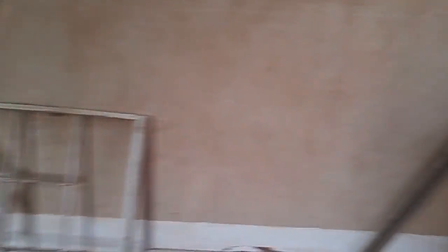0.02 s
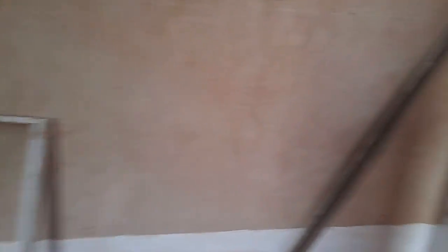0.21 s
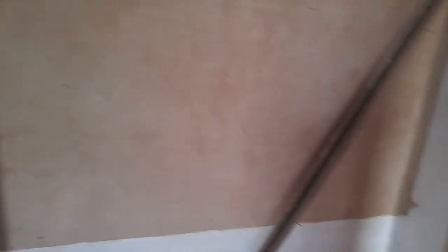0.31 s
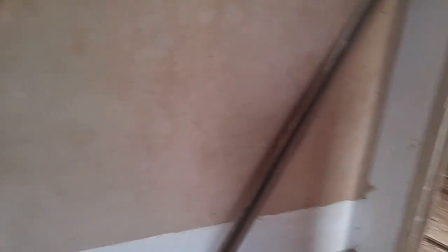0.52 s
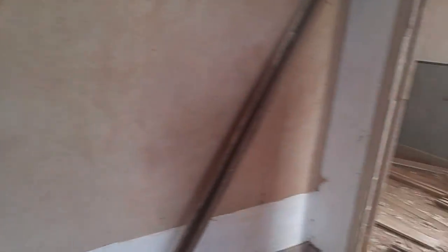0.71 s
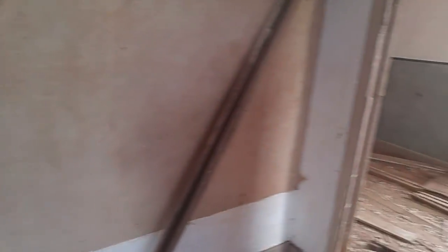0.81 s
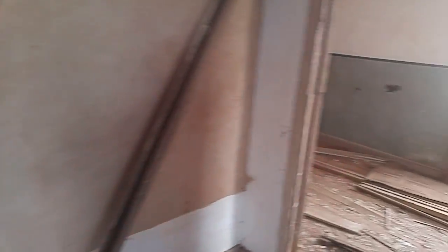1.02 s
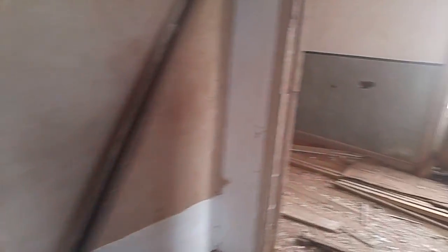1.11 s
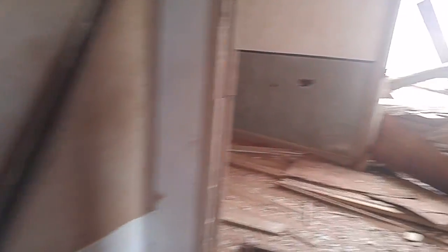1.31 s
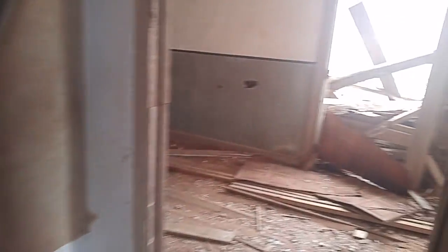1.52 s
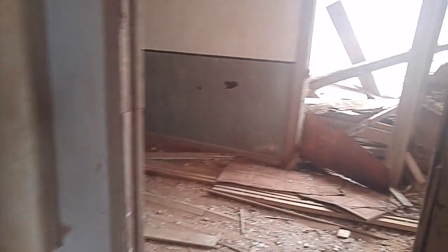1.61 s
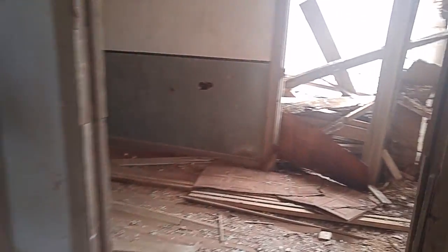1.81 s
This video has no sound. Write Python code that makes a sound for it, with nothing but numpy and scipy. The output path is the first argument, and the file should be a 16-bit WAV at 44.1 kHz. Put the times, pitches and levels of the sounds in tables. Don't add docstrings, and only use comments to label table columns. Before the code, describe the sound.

Two footsteps on wooden rubble close to a handheld microphone: a heavy first step with board clatter and sharp plaster cracks, tumbling crumbs, then a softer second step, in a bare, hard-walled ruined room.

```python
import sys
import numpy as np
from scipy import signal
from scipy.io import wavfile
from scipy.ndimage import uniform_filter1d

SR = 44100
rng = np.random.default_rng(int(sys.argv[2]) if len(sys.argv) > 2 else 0)


def unload_audio(sound):
    columns = np.transpose(np.atleast_2d(sound))
    steps = np.round(np.clip(columns, -1, 1) * 32767)
    wavfile.write(sys.argv[1], SR, steps.astype(np.int16))


def gain_from_db(level_db):
    decades = np.asarray(level_db, float) / 20
    return 10 ** decades


N = 83790


def evened(x):
    return x / np.sqrt(np.mean(x ** 2) + 1e-20)


def read(points, hz):
    f, value = np.transpose(points)
    return np.interp(np.log(hz + 1), np.log(f + 1), value)


def colour(points):
    log_gain = np.log(gain_from_db(read(points, abs(np.fft.fftfreq(2048, 1 / SR)))))
    h = np.fft.ifft(np.exp(np.conj(signal.hilbert(log_gain)))).real[:1024]
    return h / np.linalg.norm(h)


def resonate(x, hz, width_hz):
    turn = np.exp(2j * np.pi * hz * np.arange(x.shape[-1]) / SR)
    r = np.exp(-np.pi * width_hz / SR)
    return 2 * (turn * signal.lfilter([1 - r], [1, -r], x / turn)).real


def resonate_twice(x, hz, width_1_hz, width_2_hz):
    return resonate(resonate(x, hz, width_1_hz), hz, width_2_hz)


def ring(hz, t60_s):
    t = np.arange(SR // 6) / SR
    return gain_from_db(-60 * t / max(t60_s, .003)) * np.sin(2 * np.pi * hz * t) * (1 - np.exp(-t * hz * 2))


def add(mix, start_s, sound):
    part = mix[..., round(start_s * SR):][..., :sound.shape[-1]]
    part += sound[..., :part.shape[-1]]


def clicks(per_s, spread_db, count):
    excess = np.minimum(rng.exponential(1, (count, N)), 4)
    size = gain_from_db(spread_db * excess) * rng.choice([-1., 1.], (count, N))
    return size * (rng.random((count, N)) < per_s / SR)


# (frequency [Hz], correlation)
LIKENESS = [(40, .985), (150, .95), (350, .97), (620, .35), (1100, 0), (15000, 0)]


def pair(frames, hz):
    a, b, c, d = rng.standard_normal((frames, len(hz), 4)).T
    same = np.clip(read(LIKENESS, hz), -1, 1)[:, None]
    left = a + 1j * b
    right = same * left + np.sqrt(1 - same ** 2) * (c + 1j * d)
    return np.array([left, right])


# (frequency [Hz], density [dB per Hz])
AIR_SPECTRUM = [(30, -60), (60, -19), (100, -6.5), (250, -20.5), (520, -18.5), (750, -14), (2500, -41.5),
                (16000, -43.5)]


def air():
    level_db = -59.5
    hz = np.fft.rfftfreq(1024, 1 / SR)
    spectra = pair(N // 256 + 5, hz) * gain_from_db(read(AIR_SPECTRUM, hz))[:, None]
    noise = signal.istft(spectra, nperseg=1024, noverlap=768)[1][:, :N]
    return gain_from_db(level_db) * evened(noise)


# (frequency [Hz], t60 [s])
ROOM_DECAY = [(100, 0.37), (400, 0.53), (1500, 0.53), (5000, 0.45), (10000, 0.32), (16000, 0.4)]


def room(x):
    build_up_s = 0.0071
    hz, t = np.fft.rfftfreq(512, 1 / SR), np.arange(300) * 128 / SR
    spectra = pair(len(t), hz) * gain_from_db(-60 * t / read(ROOM_DECAY, hz)[:, None])
    tail = signal.istft(spectra, nperseg=512, noverlap=384)[1]
    tail = tail * np.clip(np.arange(tail.shape[1]) / SR / build_up_s - .5, 0, 1)
    return signal.fftconvolve(x, tail / np.linalg.norm(tail[0]), axes=1)[:, :N]


# (time [s], rattle level [dB], grit re rattle [dB])
STEP_LOAD = [
    [(.236, -14, -26.5), (.27, -22, -13.5), (.4, -32, -8), (.52, -33, -8), (.6, -33, -9), (.8, -34, -16),
     (1.0, -48, -16), (1.1, -50, -11), (1.38, -56.5, -9.5)],
    [(1.4, -62.5, 1.5), (1.5, -42, -13.5), (1.51, -22.5, -27), (1.59, -23, -14.5), (1.66, -37, -14.5),
     (1.75, -61.5, -3.5), (1.85, -54, -10.5), (1.88, -90, -36)],
]


def weight(axis):
    lead_s, fade_in_s = .003, 0.02
    rows, t = np.concatenate(STEP_LOAD), np.arange(N) / SR
    db = np.interp(t - lead_s, rows[:, 0], rows[:, 1:axis + 1].sum(1))
    return gain_from_db(db) * np.clip((t - rows[0, 0]) / fade_in_s, 0, 1)


# (time [s], peak level [dB], pitch [Hz], t60 [s])
JOIST_THUDS = [(0.299, -34.5, 51.8, 0.48), (0.307, -37, 169, 0.17), (0.581, -41, 50.7, 0.49),
               (0.581, -38, 162, 0.14), (1.679, -42, 181.5, 0.26), (0.879, -48, 58.4, 0.24),
               (1.19, -41.5, 105, 0.17), (1.199, -44, 51.6, 0.25), (1.497, -36, 67, 0.35),
               (1.50, -42, 115, 0.15), (1.61, -36.5, 52, 0.41), (1.712, -37, 50, 0.5),
               (1.8, -49, 60.6, 0.19), (1.492, -28, 250, 0.05)]
# (frequency [Hz], width [Hz], level [dB])
RUMBLE_TONES = [(50, 7.3, -5.5), (105, 32, -1), (169, 52, -2.5)]


def joists():
    rumble_db, still_db, side_db = -21.5, -72.5, -17.5
    rise_periods = 0.24
    push, out, t = rng.standard_normal(N), np.zeros(N), np.arange(SR // 3) / SR
    boom = sum(gain_from_db(db) * evened(resonate_twice(push, hz, width_hz, width_hz))
               for hz, width_hz, db in RUMBLE_TONES)
    for s, db, hz, t60_s in JOIST_THUDS:
        rise = 1 - np.exp(-t * hz / rise_periods)
        add(out, s, gain_from_db(db - 60 * t / t60_s) * np.sin(2 * np.pi * hz * t) * rise)
    load = uniform_filter1d(weight(axis=1), 900)
    out = out + (gain_from_db(rumble_db) * load + gain_from_db(still_db)) * evened(boom)
    return out + gain_from_db(side_db) * np.array([[1], [-1]]) * np.roll(out, shift=250)


# (time [s], peak level [dB], rise [s], dull part [dB], crumble t60 [s])
PLASTER_SNAPS = [(.2573, -26, 0.0022, -2, 0.12), (.289, -28, 0.00088, -33, 0.07),
                 (.3045, -16.5, 0.0013, -19.5, 0.098), (.4145, -17, 0.0012, -29, 0.026),
                 (.4205, -10, 0.0005, -20, 0.031), (.436, -24, 0.0013, -7, 0.022),
                 (.4735, -11, 0.0014, -12, 0.022), (.4825, -33, 0.00095, -30, 0.024),
                 (.497, -24.5, 0.00079, -15, 0.032), (.589, -17, 0.0042, -18.5, 0.041),
                 (.668, -34, .003, -25, 0.085), (.694, -18, 0.0045, -29, 0.046),
                 (.718, -31.5, 0.0041, -7.5, 0.04), (0.773, -33, 0.012, -1, 0.083)]
LATER_SNAPS = [(1.0412, -35, 0.0018, -14.5, 0.046), (1.047, -30.5, 0.00061, -9, 0.016),
               (1.055, -39, 0.0016, -14, 0.021), (1.144, -43, 0.0057, -18, 0.11),
               (1.1615, -38.5, 0.00051, -2, 0.0079), (1.169, -34, 0.00089, -19, 0.045),
               (1.266, -38, 0.0034, -8.5, 0.035), (1.366, -45.5, 0.0015, -12, 0.028),
               (1.4141, -40.5, 0.0012, -18, 0.033), (1.474, -45.5, 0.0036, -25, 0.13),
               (1.505, -29, 0.011, -9, 0.12), (1.525, -28, 0.004, -5, 0.063),
               (1.575, -25.5, 0.0056, -6.5, 0.081), (1.604, -29, 0.0025, -20, 0.073),
               (1.655, -33, .001, -20, .03)]
SHARP_CRACKS = [
    (.2983, -10.5, .0003, -16.5, 0.03),
    (.468, -5, 0.00015, -17, 0.015),
    (1.1658, -17.5, 0.00028, -20, 0.0074),
    (1.8283, -32.5, 0.00023, -25.5, 0.0088),
    (1.8287, -33.5, 0.00059, -23.5, 0.022),
]
# (frequency [Hz], level [dB])
SNAP_BRIGHT = [(1200, -54), (3500, -12.5), (5500, -1), (8500, -2.5), (12000, -8.5), (16000, -22.5)]
# (frequency [Hz], level [dB])
SNAP_DULL = [(200, -44.5), (1000, -7.5), (1900, -4.5), (2800, -11), (5000, -45.5)]
# (frequency [Hz], level [dB])
CRACK_BRIGHT = [(1200, -64), (3500, -14.5), (5500, -4), (8500, 1.5), (12000, -2), (16000, -16.5)]
# (frequency [Hz], level [dB])
LEFT_SHADE = [(3000, 1), (6000, -1), (9000, -3.5), (12000, -6)]
# (frequency [Hz], level [dB])
GRIT_SPECTRUM = [(250, -45.5), (1200, 5.5), (2200, 0), (3500, -1), (5500, -6), (8500, -2.5), (12000, -7),
                 (16000, -16)]


def plaster():
    grit_db, pan_db = -2.5, -1
    out, t = np.zeros((2, N)), np.arange(SR // 12) / SR
    dull, sharp = colour(SNAP_DULL)[None], colour(CRACK_BRIGHT)
    shaded_left = np.convolve(sharp, colour(LEFT_SHADE))[:len(sharp)]
    shaded = np.array([shaded_left, sharp]) * gain_from_db(np.array([[-2.5], [-1.5]]))
    pan = pan_db * np.array([[.5], [-.5]])
    snaps = PLASTER_SNAPS + LATER_SNAPS
    for rows, bright in ((snaps, colour(SNAP_BRIGHT)[None]), (SHARP_CRACKS, shaded)):
        for s, db, rise_s, dull_db, t60_s in rows:
            z = rng.standard_normal((3, len(t)))
            crumbling = 0.39 + abs(uniform_filter1d(z[2], 12)) * 3.48
            envelope = gain_from_db(-60 * t / max(t60_s, .004)) * (1 - np.exp(-t / max(rise_s, 1e-4)))
            burst = z[:2] * crumbling * envelope
            crack = signal.oaconvolve(burst, bright + gain_from_db(dull_db + 12) * dull, axes=1)
            add(out, s, gain_from_db(db - 8 + pan) * crack)
    grains = clicks(per_s=2200, spread_db=3, count=2)
    grit = signal.oaconvolve(grains, colour(GRIT_SPECTRUM)[None], axes=1)[:, :N]
    return out + gain_from_db(grit_db) * weight(axis=2) * evened(grit)


# (time [s], peak level [dB], pitch [Hz])
BOARD_KNOCKS = [(0.254, -11, 389), (0.261, -18.5, 898), (0.266, -8.5, 663.5), (0.279, -18.5, 338),
                (0.318, -20, 426), (0.337, -26.5, 657), (0.359, -21.5, 342), (0.382, -27, 630),
                (0.384, -33, 368), (0.411, -28, 588), (0.421, -22.5, 341), (0.465, -26.5, 945),
                (0.469, -26.5, 723), (0.496, -34, 382), (0.506, -31, 667), (0.548, -23, 677),
                (0.568, -18.5, 855), (0.58, -17.5, 408), (0.597, -26, 642), (0.597, -21.5, 391),
                (0.618, -27.5, 650), (0.621, -30, 409), (0.633, -34, 634), (0.64, -29, 407),
                (0.68, -31.5, 392), (0.713, -30.5, 686), (0.718, -29.5, 1066), (0.726, -29.5, 370),
                (0.771, -26, 372), (0.786, -30, 392), (0.861, -32, 369), (0.88, -36.5, 384),
                (0.911, -36.5, 386), (0.928, -38, 400), (1.001, -51, 405), (1.019, -43, 420),
                (1.06, -50, 394), (1.444, -50, 387), (1.513, -30, 934), (1.522, -23, 641),
                (1.531, -21.5, 308), (1.533, -27.5, 834), (1.542, -26, 623), (1.561, -21.5, 343),
                (1.569, -21.5, 721), (1.584, -23.5, 441), (1.598, -20, 725), (1.62, -21, 714),
                (1.65, -25.5, 638), (1.691, -32.5, 625), (1.694, -29, 350), (1.756, -40.5, 693),
                (1.762, -38.5, 323), (1.844, -43.5, 393)]
MORE_KNOCKS = [
    (.242, -16, 412),
    (.250, -19.5, 333),
    (.292, -21.5, 689),
    (.30, -21, 293),
    (.335, -29, 290),
    (1.508, -20.5, 440),
]
# (time [s], peak level [dB], pitch [Hz])
CHIP_TICKS = [(0.264, -33, 1220), (.277, -31, 1220), (.4200, -17.5, 5760), (.467, -27, 2050),
              (0.475, -36, 5100), (.570, -24, 950), (0.644, -35.5, 1180), (.722, -48, 1200),
              (.859, -38, 2370), (.884, -37, 1570), (1.092, -39, 1770), (1.0981, -37, 2140),
              (1.263, -43, 1380), (1.506, -36, 1180), (1.528, -32, 1200), (1.585, -33, 1410),
              (1.613, -36, 1200)]
# (frequency [Hz], level [dB], t60 [s])
BOARD_MODES = [(294, -8.5, 0.027), (360, 1, 0.11), (412.4, 1.5, 0.12), (649.7, 3, 0.067),
               (695.6, 3.5, 0.044), (752, -5.5, 0.082), (861, 7, 0.031), (1040, -5.5, 0.051),
               (1385, -9.5, 0.041), (2060, -2, 0.009)]


def boards():
    knock_t60_s, knock_rise_s, knock_lead_s, body_db = 0.042, 0.0019, .001, -9.5
    chip_t60_s, chip_width_hz = 0.017, 754
    rattle_db, rattle_per_s, rattle_spread_db = -6.5, 350, 1.5
    second_step_s, second_tilt_db_per_octave = 1.4, 4.5
    body = sum(gain_from_db(db) * ring(hz, t60_s) for hz, db, t60_s in BOARD_MODES)
    shared = gain_from_db(body_db) * body / abs(body).max()
    out = np.zeros(N)
    soft = 1 - np.exp(-np.arange(len(body)) / SR / knock_rise_s)
    for s, db, hz in BOARD_KNOCKS + MORE_KNOCKS:
        knock = ring(hz, knock_t60_s * rng.uniform(0.93, 1.18)) + shared
        add(out, s - knock_lead_s, gain_from_db(db + 3) * soft * knock)
    chip_decay = gain_from_db(-60 * np.arange(900) / SR / chip_t60_s)
    for s, db, hz in CHIP_TICKS:
        burst = rng.standard_normal(900) * chip_decay
        add(out, s, gain_from_db(db + 13) * resonate_twice(burst, hz, chip_width_hz, 2 * chip_width_hz))
    trains = clicks(rattle_per_s / 6, rattle_spread_db, count=2 * len(BOARD_MODES))
    second = np.arange(N) > second_step_s * SR
    rattle = np.zeros(N)
    for train, (hz, db, t60_s) in zip(trains, BOARD_MODES + BOARD_MODES):
        mode = gain_from_db(db) * ring(hz * rng.uniform(0.921, 1.088), 0.36 * t60_s)
        tilt = gain_from_db(second_tilt_db_per_octave * np.log2(hz / 500) * second)
        rattle += signal.oaconvolve(train, mode)[:N] * tilt
    return out + gain_from_db(rattle_db) * weight(axis=1) * evened(rattle)


def scene():
    board_room_db, plaster_room_db = -6, -5
    wood, bits = boards(), plaster()
    wet = room((gain_from_db(board_room_db) * wood + gain_from_db(plaster_room_db) * bits.mean(0))[None])
    direct = np.array([np.roll(wood, shift=5), wood]) * gain_from_db(np.array([[-.6], [.6]]))
    return direct + bits + wet + joists() + air()


def low_pass(x):
    return signal.sosfilt(signal.butter(12, 16650, fs=SR, output="sos"), x)


# (frequency [Hz], width [Hz], lift [dB])
MIC_PORTS = [
    (7660, 940, -2.5),
    (8783, 780, 8.5),
]


def record(dry):
    notch_hz, notch_width_hz, notch_depth = 523, 156, 0.68
    low_cut_hz, edge_hz, ceiling = 41, 16200, 1.1
    hush_s, hush_db = 1.858, -5
    lifted = np.array([x + gain_from_db(db) * resonate_twice(x, hz, 2 * width_hz, 2 * width_hz)
                       for x, (hz, width_hz, db) in zip(dry, MIC_PORTS)])
    lifted = lifted - notch_depth * resonate(lifted, notch_hz, notch_width_hz)
    lifted = signal.lfilter(*signal.butter(2, low_cut_hz, "high", fs=SR), lifted)
    rounded = ceiling * np.tanh(lifted / ceiling)
    limited = signal.oaconvolve(rounded, signal.firwin(255, edge_hz, fs=SR)[None], "same")
    hush = np.clip((np.arange(N) / SR - hush_s) * 100, 0, 1)
    return low_pass(limited * gain_from_db(hush_db * hush))


dry = scene()
out = record(dry)
unload_audio(out)
```